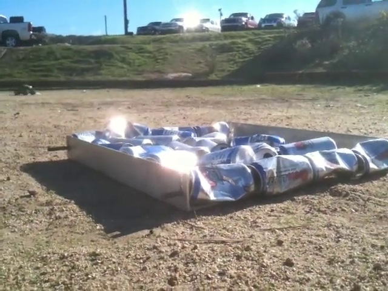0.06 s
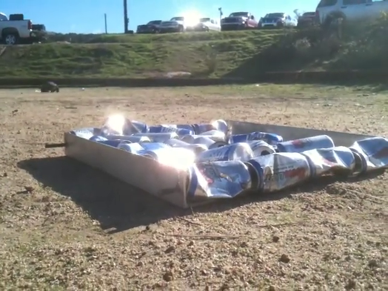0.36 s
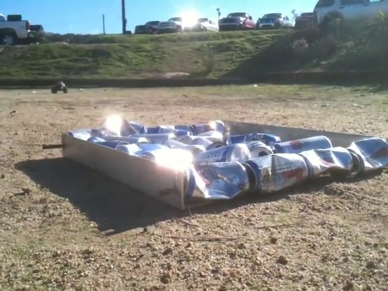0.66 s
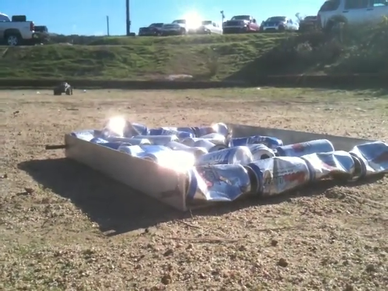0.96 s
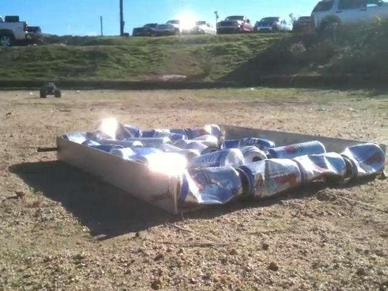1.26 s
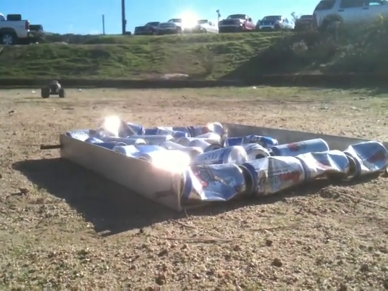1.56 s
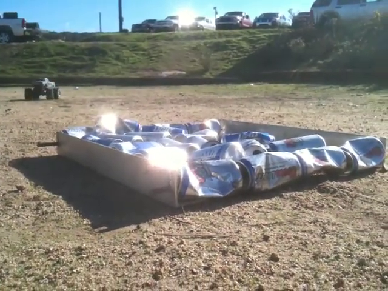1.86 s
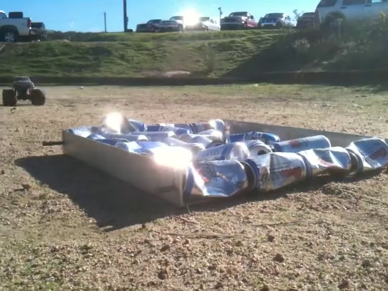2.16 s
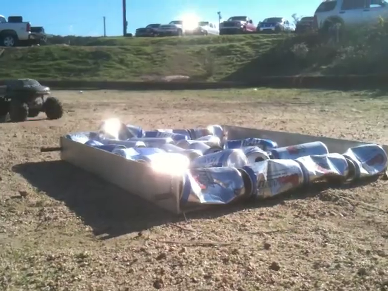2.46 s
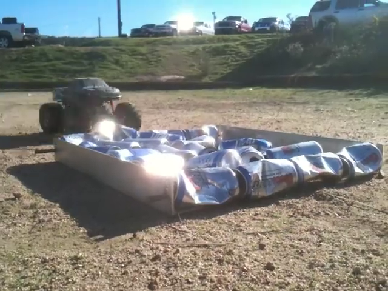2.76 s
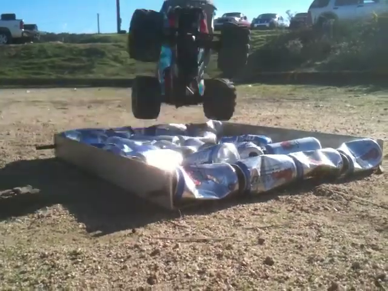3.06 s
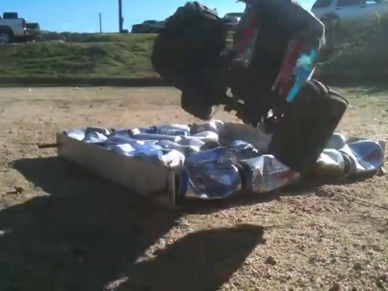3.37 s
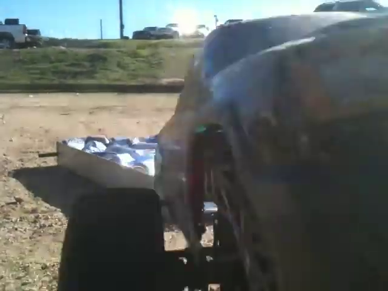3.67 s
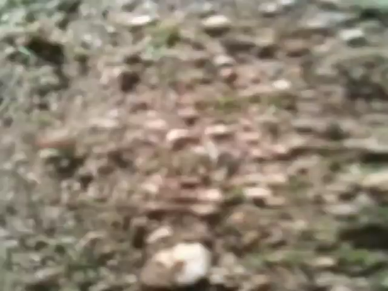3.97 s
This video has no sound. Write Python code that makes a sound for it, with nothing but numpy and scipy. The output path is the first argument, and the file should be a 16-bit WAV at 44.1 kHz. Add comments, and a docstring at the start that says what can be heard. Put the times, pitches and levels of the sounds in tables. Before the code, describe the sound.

Aluminium cans crunch and clatter as a whining radio-controlled truck ploughs over them and lands hard.

```python
"""Under an open-air hush and a far idling engine, a radio-controlled truck sets off with a faint squeal.
It drives up over dirt, tyres crunching, gears hissing, motor whining. Near 3 s it ploughs into a tray
of aluminium cans, which buckle in volleys of snaps; it leaps and lands on them again. It whirrs off
and, near 3.8 s, thumps the ground right at the camera, overloading the microphone.
Last, grit raps on the camera's case."""
import sys
import numpy as np
from scipy import signal
from scipy.fft import rfft, irfft
from scipy.io import wavfile

SR = 44100
rng = np.random.default_rng(int(sys.argv[2]) if len(sys.argv) > 2 else 0)


def persist_wave(psi):
    """Save psi, clipped to +-1, as 16-bit WAV."""
    counts = np.round(np.clip(psi, -1, 1) * 32767).astype(np.int16)
    wavfile.write(sys.argv[1], SR, np.atleast_2d(counts).T)


N = 176400
T = np.arange(N) / SR
AGE = T[:SR // 2]  # seconds since a hit


def amp(db):
    """Decibels to gain."""
    return 10 ** (np.asarray(db) / 20)


def unit(x):
    """Scales to rms 1."""
    return x / np.sqrt(np.mean(x ** 2) + 1e-20)


def lasting(x, seconds):
    """Scales to the energy of an rms-1 sound of this length."""
    return x * np.sqrt(abs(seconds) * SR / (np.sum(x ** 2) + 1e-20))


def fader(points):
    """Gain ride through (t/s, level/dB) points."""
    return amp(np.interp(T, *np.transpose(points)))


def add(mix, start, sound):
    """Mixes a sound in at a start time in seconds."""
    part = mix[round(start * SR):][:len(sound)]
    part += sound[:len(part)]


def eq(x, points, size=4096):
    """Minimum-phase EQ through (f/Hz, level/dB) points."""
    hz, db = np.transpose(points)
    bins_hz = abs(np.fft.fftfreq(size, 1 / SR))
    log_gain = np.log(amp(np.interp(np.log(bins_hz + 1), np.log(hz), db)))
    taps = np.fft.ifft(np.exp(np.conj(signal.hilbert(log_gain)))).real
    return signal.fftconvolve(x, taps[:size // 2])[:len(x)]


def drift(rate_hz):
    """Random modulator of rms 1, rolled off above the rate."""
    rolloff = 1 + (np.fft.rfftfreq(N, 1 / SR) / rate_hz) ** 4
    return unit(irfft(rfft(rng.standard_normal(N)) / rolloff, N))


def fade(t60):
    """Decay that falls 60 dB in t60 seconds."""
    return np.exp(-np.log(1000) * AGE / max(t60, 1e-4))


def swell(length):
    """Half-sine fade in and out."""
    return np.sin(np.pi * np.minimum(T / length, 1))


def burst(t60, tail_db, tail_t60):
    """Noise standing for dense modes: a quick crack and a weaker, longer ring."""
    return rng.standard_normal(len(AGE)) * (fade(t60) + amp(tail_db) * fade(tail_t60))


def tone(hz):
    """A sine of rms 1 that follows a pitch curve."""
    return np.sqrt(2) * np.sin(2 * np.pi * np.cumsum(hz) / SR)


# Hum tones of the far engine: f/Hz, level/dB
ENGINE_TONES = [(135.5, -52.5), (160, -61), (187, -58), (216.5, -54), (274, -60), (1031, -69.5)]
# Fader ride of the drone among them: t/s, level/dB
DRONE_RIDE = [(0, -60), (.3, -52), (.42, -62), (.66, -47), (.85, -55), (1.4, -55.5), (1.85, -47),
              (2.1, -58), (2.45, -52)]


def far_engine(drone_hz=246, waver_hz=1.8):
    """An idling engine hums in wavering tones while a drone swells and sinks among them."""
    hum = 0
    for hz, db in ENGINE_TONES:
        tremolo = 1 + 0.25 * drift(11)
        hum += amp(db) * unit(tremolo * tone(hz + waver_hz * drift(6.9)))
    return hum + fader(DRONE_RIDE) * tone(drone_hz + waver_hz * drift(2))


# EQ of the open-air bed: f/Hz, relative level/dB
AIR_EQ = [(20, -35), (65, -17), (95, -10.5), (135, 1.5), (280, 0), (480, -9.5), (1000, -16.5), (1900, -23),
          (2700, -21.5), (4000, -29), (5300, -27), (8000, -33), (11000, -37), (16000, -59)]


def open_air(db=-51):
    """A steady, dark hush of noise."""
    return amp(db) * unit(eq(rng.standard_normal(N), AIR_EQ))


# Faint, far squeal as the truck sets off: t/s, length/s, f/Hz, level/dB
SQUEAL_CUES = [(0, 0.12, 5100, -64.5), (.01, 0.12, 3060, -66.5)]


def squeal(length, hz, db, waver=.045):
    """A thin, unsteady tone that swells and fades."""
    return amp(db) * swell(length) * tone(hz * (1 + waver * drift(400)))


# Fader ride of the approaching tyres, ahead of their flicker: t/s, level/dB
TYRE_RIDE = [(0, -62), (.5, -64.5), (.8, -56.5), (1.25, -60.5), (1.57, -54.5), (1.72, -57), (1.95, -51),
             (2.1, -57.5), (2.21, -48), (2.37, -52.5), (2.48, -47), (2.76, -51), (2.95, -46.5),
             (3.3, -48.5), (3.55, -38), (3.72, -33), (3.86, -31), (4, -85)]
# EQ of the dirt: f/Hz, relative level/dB
DIRT_EQ = [(60, -31), (200, -8.5), (400, 6), (620, 0), (1200, -5.5), (1900, -13), (2700, -9.5),
           (4200, -24.5), (12500, -24), (14000, -29)]


def tyres(grains_per_s=2500, spread_db=1):
    """Tyres crunch grains of dirt, one click a grain; the level flickers."""
    grains = (rng.random(N) < grains_per_s / SR) * rng.choice([-1, 1], N)
    sizes = amp(spread_db * np.minimum(rng.exponential(1, N), 4))
    flicker = amp(1.45 * drift(21))
    return unit(eq(grains * sizes, DIRT_EQ)) * flicker * fader(TYRE_RIDE)


# Fader ride of the drive train's hiss and whine: t/s, level/dB
GEAR_RIDE = [(0, -71), (.07, -64.5), (.25, -79), (1.3, -70.5), (1.9, -62), (2.25, -70), (2.36, -63.5),
             (2.41, -59.5), (2.59, -54), (2.615, -65), (2.76, -61.5), (2.82, -51.5), (3.24, -51.5),
             (3.3, -49.5), (3.53, -41), (3.66, -36), (3.75, -50), (3.9, -50.5), (4, -38.5)]
# EQ of the hiss: f/Hz, relative level/dB
GEAR_EQ = [(1000, -18), (4800, -8), (6000, -.5), (7200, 1.5), (8800, -1.5), (10300, -8.5), (12400, -1),
           (14000, -26)]
# Gear tones inside the hiss: f/Hz, relative level/dB
GEAR_TONES = [(6900, -11), (8720, -13), (11850, -15)]


def gears(flutter=.016):
    """The drive train hisses and whines with the throttle."""
    hiss = unit(eq(rng.standard_normal(N), GEAR_EQ)) * amp(1.2 * drift(250))
    whine = sum(amp(db) * tone(hz * (1 + flutter * drift(200))) * drift(25) for hz, db in GEAR_TONES)
    return (hiss + whine) * fader(GEAR_RIDE)


# Pitch and fader ride of the motor: t/s, f/Hz, level/dB
MOTOR_RIDE = [(0, 310, -82), (0.601, 335, -71), (.8, 350, -57), (1.1, 388, -55.5), (1.3, 395, -61.5),
              (1.46, 405, -51.5), (1.68, 410, -57), (1.85, 438, -52.5), (2.1, 430, -67),
              (2.499, 385, -56.5), (2.82, 325, -55.5), (2.89, 330, -43), (2.98, 335, -46),
              (3.251, 335, -53.5), (3.502, 400, -43.5), (3.568, 390, -32), (3.641, 366, -33.5),
              (3.718, 360, -32), (3.9, 420, -46), (3.96, 420, -62)]
# Timbre of the motor: harmonic number, relative level/dB
MOTOR_HARMONICS = [(1, 2), (2, -7.5), (3, -14), (4, -14.5)]


def motor(wobble=.028, roughness=.7):
    """A rough whine that follows the wheel speed and wobbles over the bumps."""
    times, hz, db = np.transpose(MOTOR_RIDE)
    pitch = np.interp(T, times, hz) * (1 + wobble * drift(24.2))
    phase = 2 * np.pi * np.cumsum(pitch) / SR
    whine = sum(amp(harmonic_db) * (1 + roughness * drift(55)) * np.sin(k * phase)
                for k, harmonic_db in MOTOR_HARMONICS)
    return unit(whine) * amp(np.interp(T, times, db))


def snaps(length, per_s=1100, spread_db=3.5):
    """A buckle starts with one hard snap and runs on in a volley of small ones."""
    count = len(AGE)
    hits = rng.random(count) < per_s / SR
    sizes = hits * amp(spread_db * np.minimum(rng.exponential(1, count), 3.5))
    sizes[0] = 2.4  # the opening snap
    gate = np.clip((length - AGE) / 0.0024 + 1, 0, 1)
    return sizes * rng.choice([-1, 1], count) * gate


def clatter(volley, t60, tail_db, tail_t60, cans=3):
    """Each snap lands on one of a few cans, each with dense modes of its own."""
    struck = rng.integers(0, cans, len(AGE))
    return sum(signal.fftconvolve(volley * (struck == can), burst(t60, tail_db, tail_t60))[:len(AGE)]
               for can in range(cans))


# Ringing modes of a can: f/Hz, relative level/dB, t60/s
CAN_MODES = [(412.2, -4.5, 0.2), (585, 4, 0.26), (682, -8.5, 0.63), (748, 3, 0.29), (805, 2, 0.5),
             (1026.7, 0.5, 0.38), (1096, -8, 0.3), (1324, -2.5, 0.32), (1554, -5, 0.3), (1760, -1, 0.33),
             (1945, -1, 0.34), (2170, -3, 0.29), (2470, -0.5, 0.2), (2924, -3.5, 0.25)]


def can_ring(detune=0.006):
    """A can struck at a random spot rings in slightly detuned modes."""
    ring = 0
    for hz, db, t60 in CAN_MODES:
        polarity = rng.choice([-1, 1])
        pitch = hz * (1 + detune * rng.standard_normal())
        ring += amp(db) * fade(t60) * polarity * np.sin(2 * np.pi * pitch * AGE)
    return ring


# EQs of the hollow dent, the rattling shell and the bright creasing foil: f/Hz, relative level/dB
DENT_EQ = [(30, -18), (110, -26.5), (250, -11), (420, -7), (600, 0), (950, 1), (1400, -4), (2000, -13.5),
           (4000, -63)]
SHELL_EQ = [(500, -31.5), (1100, -1.5), (1550, -4.5), (2300, -2.5), (3000, -4), (4000, -9.5), (5500, -13.5),
            (9000, -32)]
CRACKLE_EQ = [(1500, -39), (4000, -8.5), (5500, -5.5), (7800, 2.5), (10000, -3), (12000, -4.5),
              (14000, -9.5), (16000, -16)]
# Cans being crushed: t/s, length/s, dent level/dB, shell level/dB, crackle level/dB
CRUNCH_CUES = [ (2.961, 0.0097, -24, -30, -37), (2.970, 0.009, -15.5, -20.5, -18.5),
               (2.981, 0.023, -21, -26, -24), (3.002, .002, -24, -22, -13), (3.008, .02, -22, -18.5, -18.5),
               (3.045, 0.009, -11.5, -16.5, -15), (3.062, 0.013, -20.5, -17.5, -15.5),
               (3.083, 0.0039, -17, -50, -42), (3.104, 0.0042, -19.5, -27, -17),
               (3.117, 0.004, -19, -21.5, -31), (3.143, 0.013, -24.5, -26.5, -29),
               (3.326, .003, -28, -29, -23), (3.359, 0.015, -24.5, -24.5, -28),
               (3.3753, 0.0034, -14, -13.5, -14), (3.387, 0.0065, -22.5, -29, -43),
               (3.414, 0.013, -14.5, -16, -18), (3.433, 0.008, -16, -18, -20),
               (3.444, .006, -13.5, -17, -20), (3.459, 0.0043, -24.5, -23.5, -32),
               (3.478, 0.025, -25, -29, -38), (3.563, 0.0077, -23, -18, -26.5),
               (3.573, 0.0095, -20, -16, -22.5), (3.590, 0.02, -25, -26.5, -50),
               (3.635, 0.092, -34, -31.5, -35), (3.716, .004, -36, -30.5, -28.5)]


def crunch(length, dent_db, shell_db, crackle_db):
    """A volley of snaps sounds the cans' dented walls, shells, creases and modes."""
    volley = snaps(length)
    dent = eq(clatter(volley, t60=0.013, tail_db=-15.5, tail_t60=0.36), DENT_EQ)
    shell = eq(clatter(volley, t60=0.012, tail_db=-10.5, tail_t60=0.33), SHELL_EQ)
    crackle = eq(clatter(volley, t60=0.007, tail_db=-18, tail_t60=0.16), CRACKLE_EQ)
    ring = signal.fftconvolve(volley, can_ring())[:len(AGE)]
    ring_db = (dent_db + shell_db) / 2 - 4
    # Gentle presses, below -20 dB, get a slower attack.
    softness_db = max(-20 - max(dent_db, crackle_db), 0)
    attack_s = 0.0018 * amp(1.6 * softness_db)
    attack = np.minimum(AGE / attack_s, 1)
    layers = [(dent_db, dent), (shell_db, shell), (crackle_db, crackle), (ring_db, ring)]
    return sum(amp(db) * lasting(layer * attack, length + 0.0056) for db, layer in layers)


# Accents from single cans, rims and stones: t/s, f/Hz, level/dB, t60/s
PING_CUES = [(3.435, 1433, -13.5, 0.062), (3.575, 3985, -14, 0.039), (3.573, 1617, -8.5, 0.033),
             (3.572, 1374, -9.5, 0.021), (3.592, 986, -17.5, 0.11), (3.652, 1490, -25, 0.092),
             (3.784, 2500, -7, 0.036), (3.833, 4550, -23, 0.033), (3.838, 1740, -15.5, 0.021),
             (3.9938, 2990, -8, 0.0085)]


def ping(hz, db, t60):
    """One struck mode rings briefly."""
    attack = np.minimum(AGE / 0.0009, 1)
    return amp(db) * np.sqrt(2) * fade(t60) * attack * np.sin(2 * np.pi * hz * AGE)


# Pass-by of the drive train: t/s, length/s
WHIRR_CUES = [(3.62, 0.08)]
# Partials of its whirr: f/Hz, level/dB
WHIRR_TONES = [(880, -30), (1360, -28), (1590, -29), (3100, -37)]


def whirr(length, fall_per_s=0.99, flutter=0.013):
    """The spinning drive train swells as it passes, and its partials sink together."""
    bend = np.exp(-fall_per_s * T) * (1 + flutter * drift(80))
    return swell(length) * sum(amp(db) * tone(hz * bend) for hz, db in WHIRR_TONES)


# Boom of the tyres and chassis: f/Hz, relative level/dB, t60/s
BOOM_MODES = [(150.5, -2, 0.14), (218.6, 4.5, 0.072), (278.5, 2, 0.12), (400, 2.5, 0.083),
              (580, 2.5, 0.057), (743, -1, 0.071), (1107, -12, 0.069)]
# EQs of the boxy body and the hard clack: f/Hz, relative level/dB
BODY_EQ = [(100, -33), (450, -10.5), (760, 2.5), (1250, 0), (1800, -6.5), (3000, -30), (6000, -43)]
CLACK_EQ = [(30, -32), (150, -5), (700, 5.5), (1300, -4.5), (2500, 0), (4500, -7.5), (9000, -8),
            (16000, -17)]
# The truck hitting the ground: t/s, boom level/dB, body level/dB, clack level/dB
THUMP_CUES = [(3.7604, -5.5, -20, -16), (3.7672, -6.5, -13, -9), (3.7709, -14, -10, -11),
              (3.784, -19, -19, -10), (3.786, -13, -12, -10), (3.7912, -15, -3.5, -6),
              (3.8045, -5.5, -6, -13.5), (3.822, -30, -22.5, -27.5)]


def thump(boom_db, body_db, clack_db):
    """Hollow tyres boom, the plastic body shudders and the chassis clacks."""
    boom = lasting(sum((-1) ** k * ping(*mode) for k, mode in enumerate(BOOM_MODES)), 0.0078)
    body = lasting(eq(burst(t60=0.053, tail_db=-22, tail_t60=0.078), BODY_EQ), 0.0066)
    clack = lasting(eq(burst(t60=0.012, tail_db=-21, tail_t60=0.18), CLACK_EQ), 0.0099)
    return amp(boom_db) * boom + amp(body_db) * body + amp(clack_db) * clack


# EQ of the grit's tick: f/Hz, relative level/dB
TICK_EQ = [(30, -18), (300, 2.5), (1300, -2), (2100, -4), (3000, -4), (6000, -3.5), (7600, 4), (10500, 2.5),
           (16000, -10.5)]
# Grit hitting the camera: t/s, tick level/dB, knock level/dB, knock f/Hz
RAP_CUES = [(3.9162, -2, 2, 248.4), (3.9215, -14, -2.5, 184), (3.935, 0, 5.5, 478), (3.9455, -13, -38, 485),
            (3.973, 0, 6.5, 573), (3.9938, -17, -56, 507)]


def rap(tick_db, knock_db, knock_hz):
    """Grit lands with a sharp tick, and the camera's case gives a short knock."""
    crack = eq(burst(t60=0.012, tail_db=-32, tail_t60=0.02), TICK_EQ)
    tick = lasting(crack * np.minimum(AGE / 0.0014, 1), 0.0022)
    knock = np.minimum(AGE / 0.0025, 1) * fade(t60=0.014) * np.sin(2 * np.pi * knock_hz * AGE)
    return amp(tick_db) * tick + amp(knock_db) * knock


def scene():
    """Mono mix: the ambience and the running truck, with each spot effect on its cue."""
    mix = far_engine() + open_air() + tyres() + gears() + motor()
    for source, cues in ((squeal, SQUEAL_CUES), (crunch, CRUNCH_CUES), (ping, PING_CUES),
                         (whirr, WHIRR_CUES), (thump, THUMP_CUES), (rap, RAP_CUES)):
        for start, *settings in cues:
            add(mix, start, source(*settings))
    return mix[None]


def record(dry):
    """Two microphone stages each shed bass, overload on the hardest blows and trim the top."""
    low_cut_hz, high_cut_hz, ceiling = 56, 15850, .71
    low_cut = signal.butter(2, low_cut_hz, "highpass", fs=SR, output="sos")
    high_cut = signal.firwin(401, high_cut_hz, window=("kaiser", 9), fs=SR)[None]
    sound = dry
    for stage in ("preamplifier", "converter"):
        oversampled = signal.resample_poly(signal.sosfilt(low_cut, sound), 2, 1, axis=1)
        clipped = oversampled / (1 + (oversampled / ceiling) ** 12) ** (1 / 12)
        sound = signal.oaconvolve(signal.resample_poly(clipped, 1, 2, axis=1), high_cut, "same")
    return sound


dry = scene()
out = record(dry)
persist_wave(out)
```